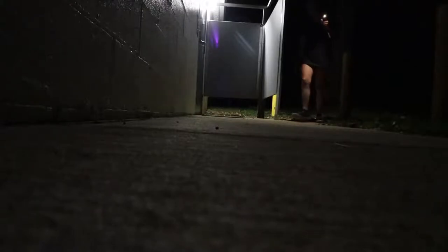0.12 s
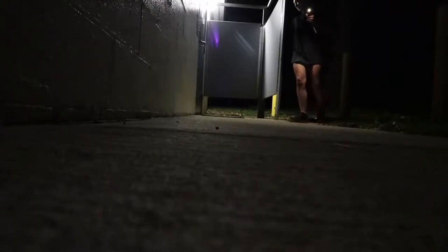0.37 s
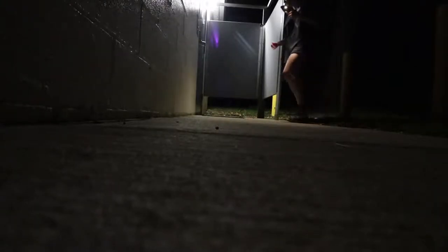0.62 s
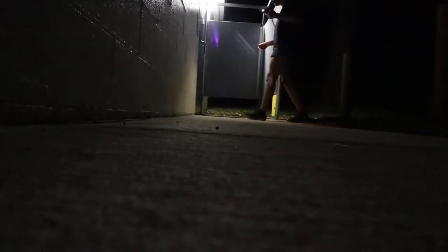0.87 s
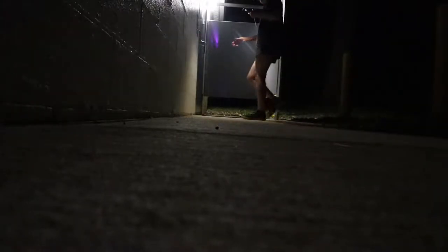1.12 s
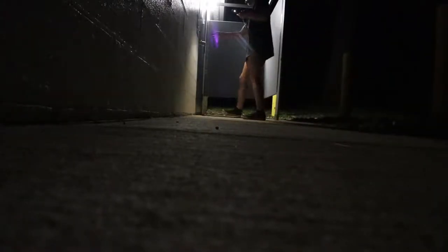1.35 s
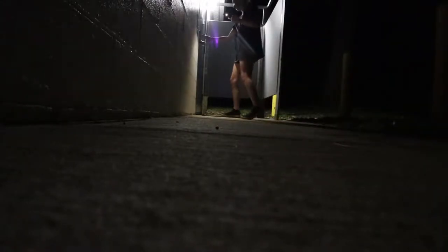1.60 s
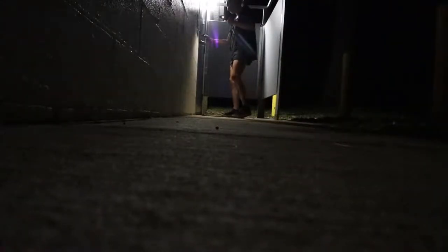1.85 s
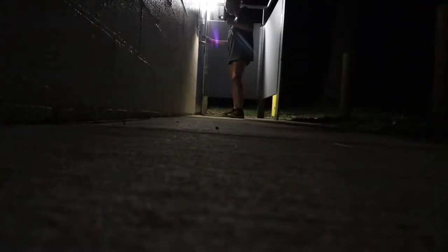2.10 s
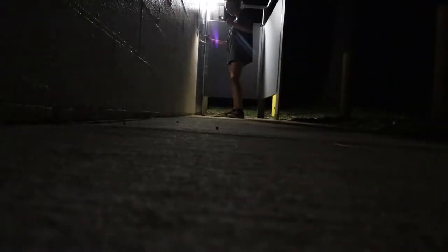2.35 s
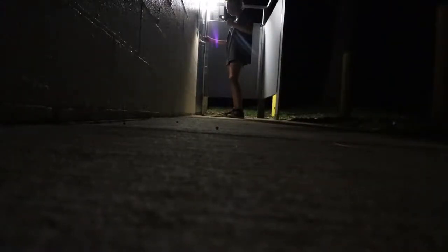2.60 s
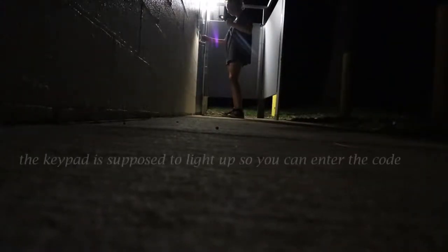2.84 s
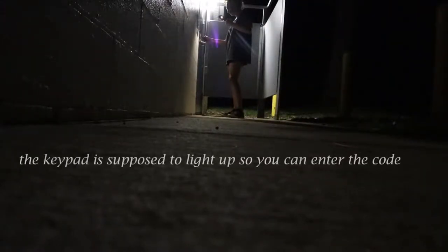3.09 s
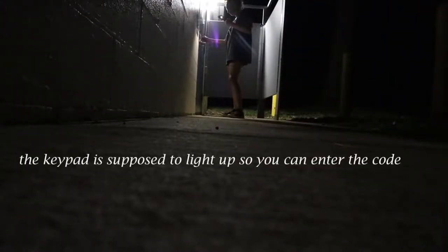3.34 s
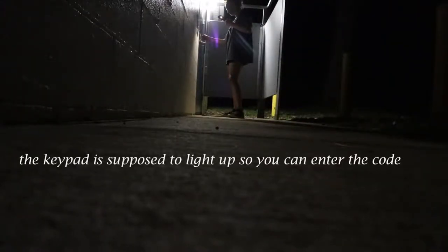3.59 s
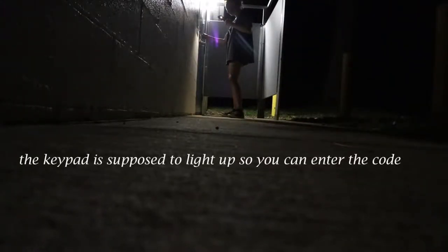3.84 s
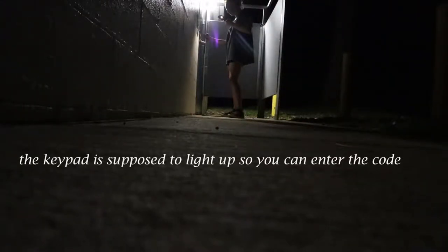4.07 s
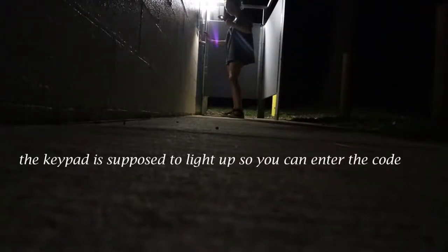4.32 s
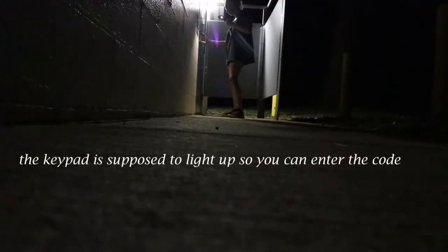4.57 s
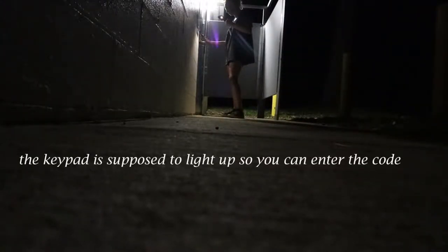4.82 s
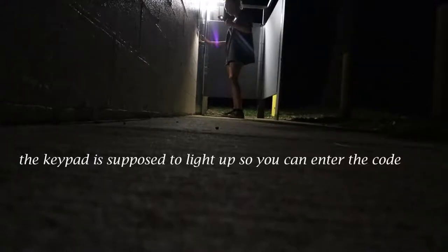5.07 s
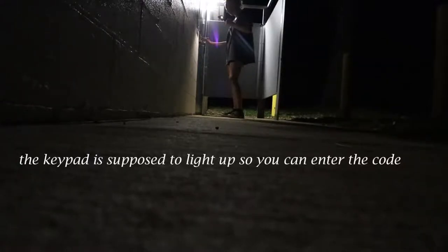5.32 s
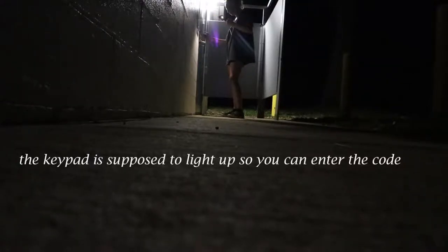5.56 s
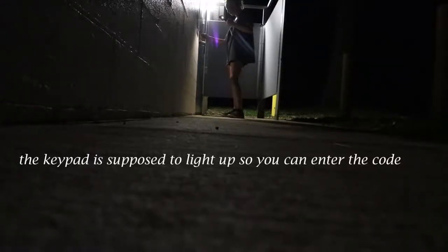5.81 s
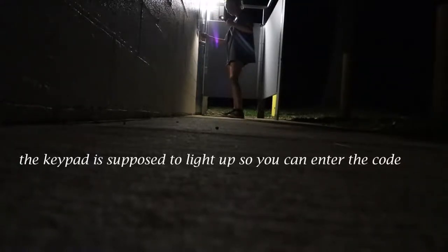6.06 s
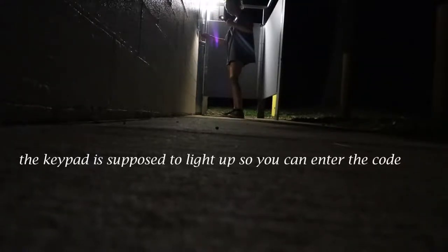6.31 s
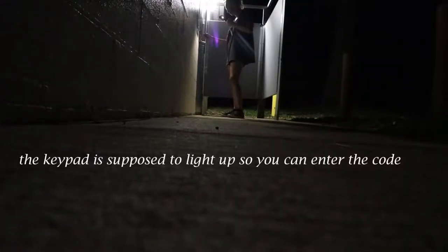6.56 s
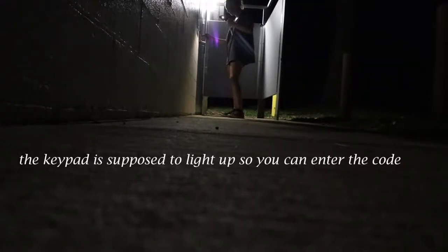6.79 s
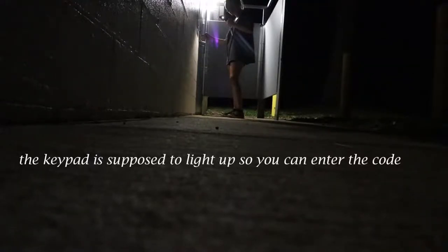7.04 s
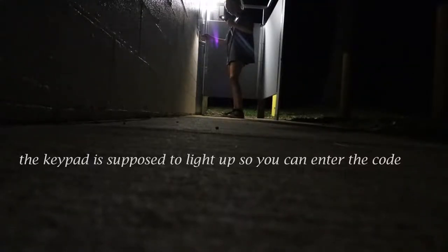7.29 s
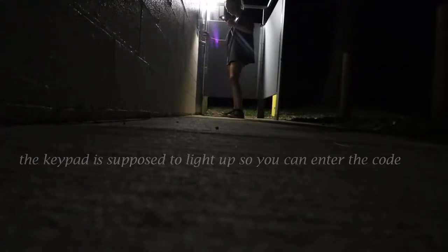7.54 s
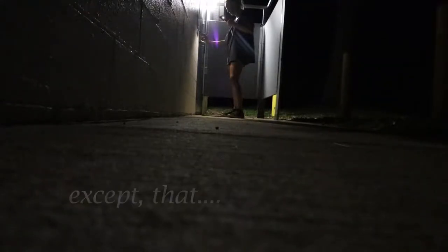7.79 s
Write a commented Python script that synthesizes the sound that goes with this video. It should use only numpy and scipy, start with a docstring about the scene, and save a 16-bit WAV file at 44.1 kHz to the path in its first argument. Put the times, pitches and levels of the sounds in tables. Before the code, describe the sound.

A warm night outdoors beside a concrete wash-house, heard in stereo near the ground. Throughout, a dense silvery cricket trill around 5 kHz swells and fades over softer, lower and higher far crickets, airy hiss, and faint low machinery hum with a slow throb. A katydid gives coarse rasping phrases of a few quick strokes at about 0.1, 1.2, 2.4, 3.6, 4.9, 6.7 and 7.8 seconds. Shoes thud and scuff on gritty concrete from 0.3 to 2.0, strongest near 1.5. A very high, thin insect ticks from 0.8, then buzzes from 1.3 to 2.3. A clear-toned cricket gives brief falling chirps at 3.1, 3.4, 4.5 and 4.9. Dull, hollow keypad presses knock at 4.5 and 4.8, with fainter ones at 4.7 and 5.1. From 5.2 a distant engine's low drone fades in, gradually rising and wavering to the end at about 8 seconds.

```python
"""A summer night beside a concrete wash-house, heard near the ground. From the start there are noise-shaped air with
a far cricket crowd blurred into it, steady sine hum, pulsed-sine cricket trills near and far, and a katydid
rasping through ringing noise bands. Soon shoes thud and scuff on concrete in filtered noise, and a meadow katydid
ticks, then buzzes in treble noise. From about three seconds a cricket chirps clean falling tones. Later,
key presses ring a panel and door, and a far engine, one gliding sine, gathers speed and wavers."""
import sys
import numpy as np
from scipy import signal
from scipy.fft import rfft, irfft
from scipy.io import wavfile
from scipy.ndimage import uniform_filter1d, map_coordinates

SR = 44100
rng = np.random.default_rng(int(sys.argv[2]) if len(sys.argv) > 2 else 0)


def waveform_to_disk(signal):
    """Save audio, clipped to [-1, 1], as 16-bit WAV at the path in sys.argv[1]."""
    frames = np.transpose(np.atleast_2d(signal))
    scaled = np.clip(frames, -1, 1) * 32767
    samples = np.round(scaled).astype(np.int16)
    wavfile.write(sys.argv[1], SR, samples)


def how_loud(loudness_db):
    """Turn decibels into a plain amplitude multiplier (0 dB gives 1, 20 dB gives 10)."""
    steps = np.asarray(loudness_db, float) / 20
    return 10 ** steps


N = 348831
T = np.arange(N) / SR


def unit(x):
    """Scale to rms 1."""
    return x / np.sqrt(np.mean(x ** 2))


def band(x, hz, width):
    """Ring a resonance twice over, for steeper skirts."""
    sections = np.hstack(signal.iirpeak(hz, hz / width, SR))
    return signal.sosfilt(np.tile(sections, (2, 1)), x)


def walk(rate):
    """Wander through random values, rate of them to the second, joined smoothly."""
    points = rng.standard_normal(4096)
    curve = map_coordinates(points, [T[::8] * rate], order=2, mode="wrap")
    return curve.repeat(8)[:N]


def decay(t, t60):
    """Fall by 60 dB in t60 seconds."""
    return np.exp(-np.log(1000) * t / t60)


def pan(x, db, lag=0):
    """Share a sound between spaced microphones: left is db stronger and hears it lag samples late."""
    left, right = np.broadcast_to(x, (2, N))
    return np.array([np.roll(left, lag) * how_loud(db / 2), right * how_loud(-db / 2)])


def echo(x, t60, db):
    """Walls and trees scatter the sound back as a decaying noise tail, different in each channel."""
    t = T[:SR * 3 // 4]
    tail = rng.standard_normal((2, len(t))) * decay(t, t60) * np.minimum(t / 0.0018, 1)
    tail /= np.sqrt(np.sum(tail ** 2, axis=1, keepdims=True))
    wet = signal.fftconvolve(np.broadcast_to(x, (2, N)), tail, axes=1)
    # the overhang wraps round, so the air rings from the start
    wet = wet[:, :N] + np.pad(wet[:, N:], ((0, 0), (0, N - len(t) + 1)))
    return (x + how_loud(db) * wet) / np.sqrt(1 + how_loud(2 * db))


def add(out, s, burst):
    """Mix a short sound in at time s."""
    i = min(max(int(s * SR), 0), N)
    out[i:i + len(burst)] += burst[:N - i]


def beats(first, last, every):
    """Shares 0-1 of the way from first to last at which a repeated stroke falls."""
    return np.linspace(0, 1, int(round((last - first) / every)) + 1)


# night air, rumble and hiss, with a far cricket crowd blurred into noise around 5 kHz:
# (frequency [Hz], level [dB per Hz])
AIR_SPECTRUM = [(18, -76), (40, -77.5), (70, -70.5), (150, -74), (300, -75), (550, -79), (1100, -85),
                (1800, -86), (3200, -84.5), (4400, -85.5), (4950, -64), (5600, -76.5), (6900, -83.5),
                (7500, -96.5), (8500, -97), (11000, -102), (15500, -105)]
# stereo image of the air: (frequency [Hz], left-right likeness [0-1], left minus right [dB])
AIR_IMAGE = [(30, 0.5, -2), (70, 0.91, -5), (150, 1, 6.5), (300, 0.64, -0.5), (565, 0.71, 0.5),
             (1120, 0.1, 2), (2220, 0.18, 0.5)]


def air():
    """Rumble, hiss and a blurred far cricket crowd: shaped noise, most alike in both channels in the bass."""
    log_hz = np.log(np.fft.rfftfreq(N, 1 / SR) + 1)
    hz, db = np.transpose(AIR_SPECTRUM)
    gain = how_loud(np.interp(log_hz, np.log(hz), db)) * np.sqrt(SR / 2)
    hz, alike, pan_db = np.transpose(AIR_IMAGE)
    likeness = np.clip(np.interp(log_hz, np.log(hz), alike), 0, 1)
    lean = how_loud(np.interp(log_hz, np.log(hz), pan_db) / 2)
    noise = rfft(rng.standard_normal((2, N))) * gain
    mid, side = noise * np.sqrt([1 + likeness, 1 - likeness])
    return pan(irfft(np.array([(mid + side) * lean, (mid - side) / lean]), N), 0, lag=7)


# steady machine tones: (frequency [Hz], level [dB])
HUM_LINES = [(59.2, -51), (158.2, -50), (183, -57), (244, -60), (312, -60)]
# one throbbing tone: (frequency [Hz], level at its peaks [dB], period [s], first peak [s], depth [0-1])
HUM_THROB = (121.3, -48.5, .413, .13, .9)


def machinery_hum():
    """Machinery sounds low sine tones that waver in pitch and level, and one that throbs."""
    waver_db, waver_hz = 1.3, 0.5
    out = np.zeros(N)
    for hz, db in HUM_LINES:
        level = how_loud(db + waver_db * walk(4))
        out += level * np.sin(2 * np.pi * np.cumsum(hz + waver_hz * walk(2.05)) / SR)
    hz, db, period, peak, depth = HUM_THROB
    throb = 1 - depth * np.sin(np.pi * (T - peak) / period) ** 2
    out += how_loud(db) * throb * np.sin(2 * np.pi * hz * T)
    return pan(np.sqrt(2) * out, -1.5, lag=7)


def crickets(hz, spread_hz, waver_hz, rate, rate_spread, share, fall_hz, echo_db, count, octave_db=-60):
    """Each singer scrapes short unsteady tones that fall in pitch as the wing slows."""
    out = 0
    for tune in np.linspace(-1, 1, count):
        pace, side = rng.standard_normal(2)
        pulses = np.cumsum(rate * (1 + rate_spread * pace + .012 * walk(5))) / SR
        # 0-1 through the pulse, then held at 1 for the silent rest of the cycle
        cycle = np.minimum(pulses % 1 / share, 1)
        pitch = hz + spread_hz * tune + waver_hz * walk(150) + fall_hz * (.5 - cycle)
        phase = 2 * np.pi * np.cumsum(pitch) / SR
        # from the side, a singer reaches the two microphones out of step
        phase = phase + np.pi * side * np.array([[1], [-1]])
        tone = np.sin(phase) + how_loud(octave_db) * np.sin(2 * phase)
        strength = how_loud(2 * walk(3))
        out = out + tone * np.sin(np.pi * cycle) * strength
    out = echo(out, 0.3, echo_db)
    # a crowd keeps its summed loudness steady over a few pulses
    return out / np.sqrt(uniform_filter1d(out ** 2, SR // 14, axis=1))


# nearest trilling crickets swell and fade together: (time [s], level [dB])
TRILL_SWELL = [(0.0, -32.5), (0.02, -30.5), (0.42, -39.5), (0.57, -29), (0.86, -33), (1.63, -36),
               (1.89, -30), (2.05, -37), (2.36, -27.5), (2.4, -33), (2.64, -36.5), (2.82, -29.5),
               (2.93, -35), (4.05, -32), (4.16, -38.5), (4.45, -28.5), (4.67, -35.5), (4.95, -32),
               (5.57, -34), (6.52, -33), (6.63, -37.5), (6.78, -31), (7.4, -35.5), (7.69, -29),
               (7.8, -35.5), (7.91, -30)]
# their song: (pitch spread [Hz], waver [Hz], pulse rate [1/s], rate spread [share],
# pulse length [share of cycle], fall in a pulse [Hz], echo [dB])
NEAR_SONG = (80, 50, 45.6, .03, .75, 280, 3.5)
# random side-to-side wander: (mean left minus right [dB], spread [dB], changes [1/s])
TRILL_WANDER = (-1.1, 1.8, 10)


def near_trill():
    """Near crickets climb in pitch as they sing harder; the whole trill wanders sideways at random."""
    middle_hz, middle_db, climb_hz_per_db = 5074, -33, 12
    db = np.interp(T, *np.transpose(TRILL_SWELL))
    pitch = middle_hz + climb_hz_per_db * (db - middle_db)
    song = crickets(pitch, *NEAR_SONG, count=6, octave_db=-35)
    mean_db, spread_db, per_s = TRILL_WANDER
    # unrelated left and right carry twice the power of their mean
    return pan(np.sqrt(2) * song * how_loud(db), mean_db + spread_db * walk(per_s))


# low tree cricket, tree, field and ground crickets: (pitch [Hz], left minus right [dB], pitch spread [Hz],
# waver [Hz], pulse rate [1/s], rate spread [share], pulse length [share of cycle], fall [Hz], echo [dB])
FAR_KINDS = [(2122, -3, 18, 16.4, 38, .03, 0.72, 40, 4), (2512, 2.5, 115, 35, 50, .15, .7, 120, -5.5),
             (5846, -3, 70, 60, 30, 0.18, .7, 130, 12), (6336, -0.5, 430, 200, 72, .3, .6, 350, 14)]
# one value for each kind, in the same order: level [dB]
FAR_LEVELS = (-61, -55, -50.5, -50)
# short dip of the low tree cricket: (from [s], to [s], fade [s])
LOW_DIP = (6.08, 6.1, 0.11)


def far_crickets():
    """Four farther kinds trill and drift in level; the lowest dips briefly."""
    drift_db, drift_per_s = 2.56, 1.38
    start, end, fade = LOW_DIP
    dip = np.clip(np.maximum(start - T, T - end) / fade + .5, 0, 1)
    out = np.zeros((2, N))
    for kind, db, count, on in zip(FAR_KINDS, FAR_LEVELS, (2, 6, 4, 8), (dip, 1, 1, 1)):
        hz, pan_db, *song = kind
        level = how_loud(db + drift_db * walk(drift_per_s))
        out += pan(np.sqrt(2) * on * crickets(hz, *song, count=count) * level, pan_db)
    return out


# katydid phrases: (middle of first full stroke [s], middle of last stroke [s], level [dB])
KATYDID_PHRASES = [(0.067, 0.288, -36), (1.232, 1.44, -36), (2.358, 2.668, -37), (3.568, 3.886, -37),
                   (4.91, 5.227, -37.5), (6.658, 6.972, -37), (7.843, 7.952, -35.5)]
# weak stroke leading a phrase: (time ahead [s], relative level [dB], length [s])
WEAK_OPENER = (0.084, -5, 0.044)


def katydid_strokes():
    """Yield middle, level and length of each wing stroke; longer phrases slow a little."""
    every_s, length_s, scatter_db, slowing = 0.107, 0.1, 1, 1.036
    ahead, weak_db, short = WEAK_OPENER
    for first, last, db in KATYDID_PHRASES:
        if first - ahead > 0:
            yield first - ahead, db + weak_db, short
        for u in beats(first, last, every_s):
            s = first + (last - first) * u ** slowing
            yield s, db + scatter_db * rng.standard_normal(), length_s


# noisy wing resonances: (frequency [Hz], width [Hz], level [dB])
KATYDID_WING = [(2290, 490, -4), (2943, 320, -6.5), (3335, 370, 1), (3690, 300, -8.5), (4435, 910, 7),
                (5670, 1980, -3), (9450, 1300, -24), (11920, 2300, -11), (14700, 2700, -12)]
# tooth-strike note early in each stroke: (pitch [Hz], rise through the note [Hz], waver [Hz],
# lead [s], length [share of stroke], echo [dB])
KATYDID_NOTE = (2300, 50, 70, .011, .7, -6)


def katydid():
    """Each stroke sounds a rising tooth-strike note, while dense uneven strikes ring the wing."""
    hz, rise_hz, waver_hz, lead, share, note_echo_db = KATYDID_NOTE
    note_db, octave_db = 1.5, -7
    t60_s, rasp_echo_db = 0.55, -2.5
    effort, onset, through = np.zeros((3, N))
    for s, db, length in katydid_strokes():
        add(effort, s - length / 2, how_loud(db) * np.hanning(int(length * SR)))
        note_start = s - lead - share * length / 2
        size = int(share * length * SR)
        # the short opening stroke sounds the note more weakly
        add(onset, note_start, how_loud(db - 4.2 * (length < .06)) * np.hanning(size))
        add(through, note_start, np.linspace(-.5, .5, size))
    teeth = rng.standard_normal(N) * how_loud(1.1 * walk(300))
    rasp = np.zeros(N)
    for k, (wing_hz, width, db) in enumerate(KATYDID_WING):
        # neighbouring resonances alternate in sign
        rasp += (-1) ** k * how_loud(db) * unit(band(teeth, wing_hz, width))
    phase = 2 * np.pi * np.cumsum(hz + rise_hz * through + waver_hz * walk(170)) / SR
    note = onset * how_loud(note_db) * (np.sin(phase) + how_loud(octave_db) * np.sin(2 * phase))
    both = echo(rasp * effort, t60_s, rasp_echo_db) + echo(note, t60_s, note_echo_db)
    return pan(both, 1.5, lag=5)


# shoes on concrete: (time [s], relative level [dB], thud [Hz], t60 [s], gritty scuff against thud [dB])
FOOTSTEPS = [(0.316, -28.5, 240, 0.14, -16), (0.351, -35.5, 439, 0.12, -28), (0.896, -39, 210, 0.19, -25),
             (1.434, -33.5, 457, 0.17, -25), (1.51, -25.5, 660, 0.081, -21), (1.53, -25.5, 340, 0.047, -25),
             (1.712, -36, 244.6, 0.13, -25), (1.972, -29, 305, 0.12, -6), (2.009, -30, 201, 0.053, -25)]
# grit under the shoes: (time [s], level [dB], frequency [Hz], width [Hz], rise [s], t60 [s])
GRIT_CRACKS = [(0.44, -33, 11400, 7000, .0005, 0.0079), (1.973, -43.5, 8800, 5500, .004, 0.22),
               (6.568, -46, 4010, 5030, 0.00094, 0.037)]


def footsteps():
    """Shoes land softly with a low thud, a slap and a gritty scuff; loose grit cracks as brief noise."""
    out, t = np.zeros(N), T[:SR // 3]
    touch = np.minimum(t / 0.0023, 1)
    for s, db, hz, t60, scuff_db in FOOTSTEPS:
        thud, slap, scuff = rng.standard_normal((3, len(t)))
        body = unit(band(thud, hz, 0.62 * hz))
        body += 0.5 * unit(band(slap, 790, 980))
        body += how_loud(scuff_db) * unit(band(scuff, 6000, 9000))
        add(out, s, how_loud(db) * 0.57 * body * touch * decay(t, t60))
    for s, db, hz, width, rise, t60 in GRIT_CRACKS:
        crack = unit(band(rng.standard_normal(len(t)), hz, width))
        add(out, s, how_loud(db) * crack * np.minimum(t / rise, 1) * decay(t, t60))
    return pan(echo(out, 0.86, -12), 1.5)


# lone ticks: (time [s], level [dB])
MEADOW_TICKS = [(0.8345, -47), (0.9512, -44), (1.0515, -43.5), (1.147, -43)]
# buzz of paired strokes: (start [s], end [s], pair period [s], second stroke after [s], middle level [dB])
MEADOW_BUZZ = (1.259, 2.33, .0646, .034, -47.3)
# wing resonances: (frequency [Hz], width [Hz], level [dB])
MEADOW_WING = [(11800, 3000, -9), (13800, 1300, 0), (15000, 1400, -3)]


def meadow_katydid():
    """Lone ticks, then a fast buzz of closing and opening strokes, ring a high-pitched wing."""
    swell_db = 3  # growth of the buzz from start to end
    effort, t = np.zeros(N), T[:SR // 10]
    for s, db in MEADOW_TICKS:
        add(effort, s, how_loud(db) * np.minimum(t / .003, 1) * np.exp(-t / 0.012))
    start, end, period, second, middle_db = MEADOW_BUZZ
    for s in np.arange(start, end, period):
        db = middle_db + swell_db * ((s - start) / (end - start) - .5)
        add(effort, s, how_loud(db) * np.hanning(int(0.022 * SR)))
        add(effort, s + second, how_loud(db - 2.5) * np.hanning(int(.024 * SR)))
    noise = rng.standard_normal(N)
    wing = np.zeros(N)
    for k, (hz, width, db) in enumerate(MEADOW_WING):
        wing += (-1) ** k * how_loud(db) * unit(band(noise, hz, width))
    return pan(echo(1.7 * unit(wing) * effort, 0.34, 1.2), 1.6, lag=5)


# runs of pulses, mostly a faint run into a strong one: (first pulse [s], last pulse [s], level [dB])
CHIRP_RUNS = [(3.1083, 3.1507, -36.5), (3.171, 3.171, -44), (3.1921, 3.1921, -35.5),
              (3.3777, 3.4166, -44.5), (3.4424, 3.5039, -35.5), (4.4209, 4.4603, -44),
              (4.486, 4.5481, -34.5), (4.794, 4.8354, -51), (4.86, 4.9028, -34.5)]


def chirping_cricket():
    """A wing sounds clean sine pulses that nearly hold their pitch, then fall away."""
    every_s, length_s = 0.021, 0.014
    pitch_hz, scatter_hz, fall_hz, scatter_db = 3420, 35, 523, 0.5
    out, u = np.zeros(N), np.linspace(0, 1, int(length_s * SR))
    shape = np.sin(np.pi * u ** 0.83) ** 0.69
    for first, last, db in CHIRP_RUNS:
        for s in first + (last - first) * beats(first, last, every_s):
            tune, push = rng.standard_normal(2)
            pitch = pitch_hz + scatter_hz * tune + fall_hz * (.2 - u ** 2)
            pulse = shape * np.sin(2 * np.pi * np.cumsum(pitch) / SR)
            add(out, s - .003, how_loud(db + scatter_db * push) * pulse)
    return echo(out, .14, -6)


# key presses: (time [s], relative level [dB])
KEY_PRESSES = [(4.546, -29), (4.701, -50), (4.824, -29), (5.095, -40)]
# ringing modes of the key panel: (frequency [Hz], level [dB], t60 [s])
PANEL_MODES = [(442, 1, 0.067), (877, 4, 0.052), (1000, -6, 0.066), (1237, 1, 0.085), (1990, -33, 0.2),
               (2680, -23, 0.057)]
# low modes of the shaken door: (frequency [Hz], level [dB], t60 [s])
DOOR_MODES = [(57, -4, 0.87), (96, -6, 1), (169.5, -4, 0.18)]


def key_presses():
    """Fingers land softly on keys, rattle them, ring the panel's modes and shake the door's."""
    out, t = np.zeros(N), T[:SR // 3]
    touch = np.minimum(t / 0.0023, 1)
    ring = np.zeros(len(t))
    for hz, db, t60 in PANEL_MODES + DOOR_MODES:
        ring += how_loud(db) * np.sin(2 * np.pi * hz * t) * decay(t, t60)
    for s, db in KEY_PRESSES:
        rattle = unit(band(rng.standard_normal(len(t)), 980, 1100)) * np.exp(-t / 0.0088)
        add(out, s, how_loud(db) * touch * (0.62 * ring + 0.52 * rattle))
        # the key bottoms out a few ms after the first touch
        add(out, s + .006, 0.42 * how_loud(db) * ring)
    return pan(echo(out, 0.86, -12), 1.5)


# far engine: (time [s], firing rate [Hz], level [dB])
ENGINE_RUN = [(5.2, 61.12, -43), (5.67, 60.98, -49), (6.35, 61.87, -40), (6.67, 64.1, -46.5),
              (6.88, 66.45, -42), (7.15, 63.2, -50), (7.43, 67.2, -46.5), (7.7, 69.1, -42),
              (7.91, 65.4, -42.5)]


def far_engine():
    """A far engine's firing rate sounds as one sine, fading in, climbing and wavering."""
    s, hz, db = np.transpose(ENGINE_RUN)
    level = how_loud(np.interp(T, s, db)) * np.clip((T - s[0]) / 0.36, 0, 1)
    tone = np.sin(2 * np.pi * np.cumsum(np.interp(T, s, hz)) / SR)
    return pan(np.sqrt(2) * level * tone, -1.5, lag=7)


def scene():
    """Sum the background, all singers, the walker and the engine."""
    background = air() + machinery_hum() + far_engine()
    singers = near_trill() + far_crickets() + katydid() + meadow_katydid() + chirping_cricket()
    walker = footsteps() + key_presses()
    return background + singers + walker


def low_pass(x):
    """Removes everything above the highest recorded frequency."""
    return signal.sosfilt(signal.butter(12, 15850, fs=SR, output="sos"), x)


def record(dry):
    """Take the finished mix as the camera hears it."""
    return low_pass(dry)


dry = scene()
out = record(dry)
waveform_to_disk(out)
```